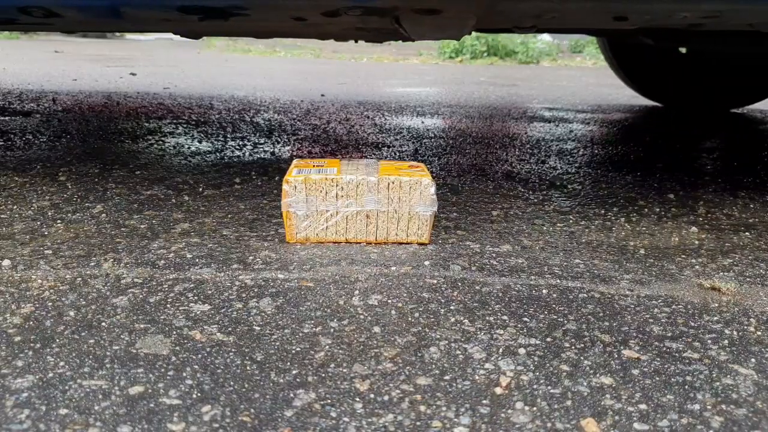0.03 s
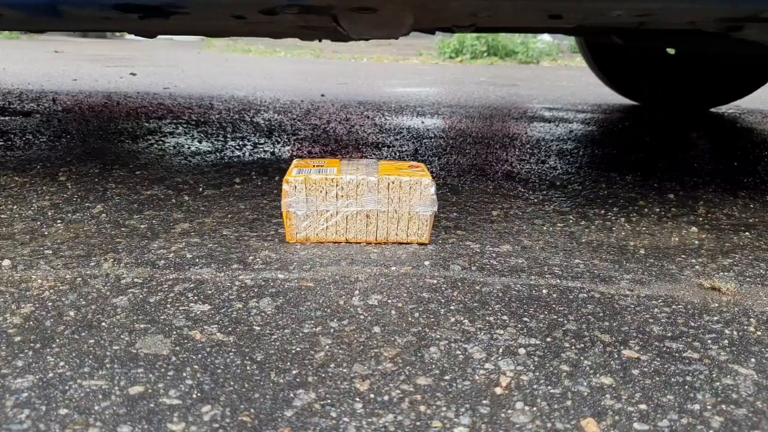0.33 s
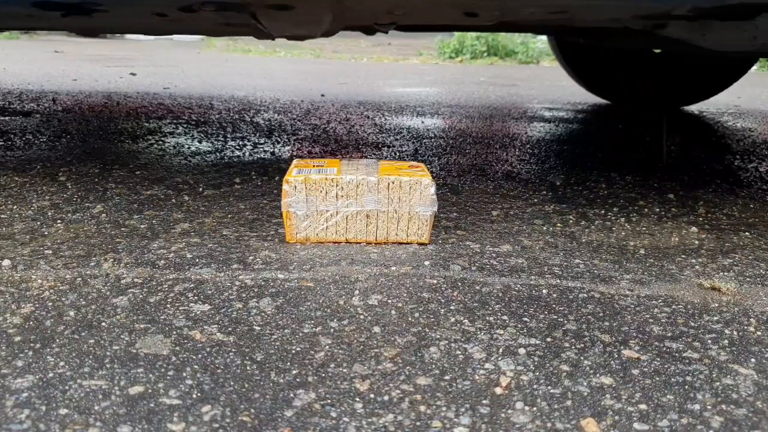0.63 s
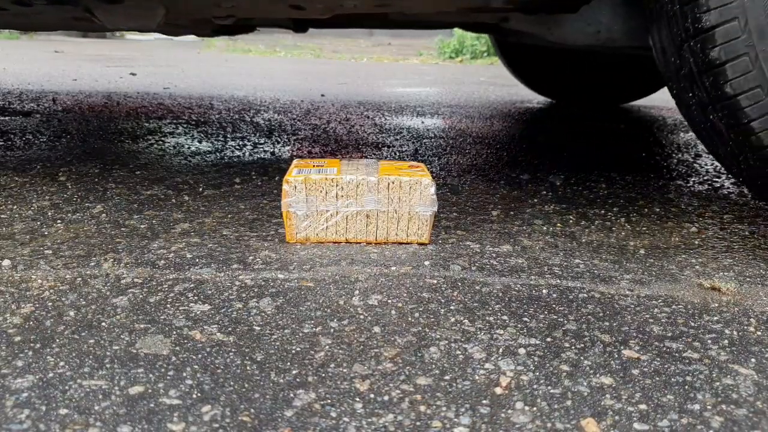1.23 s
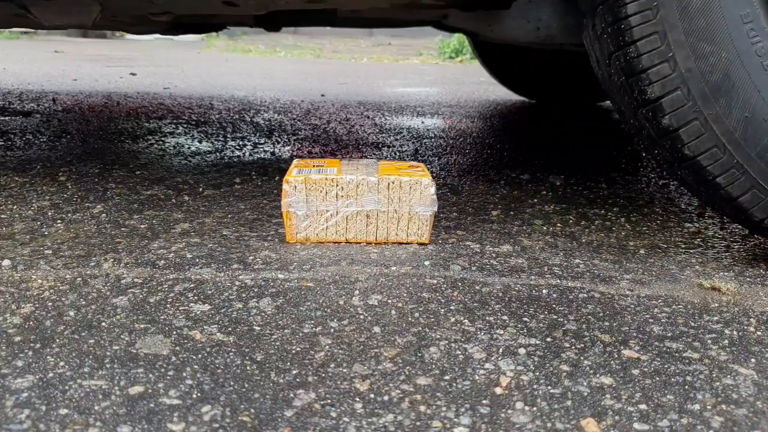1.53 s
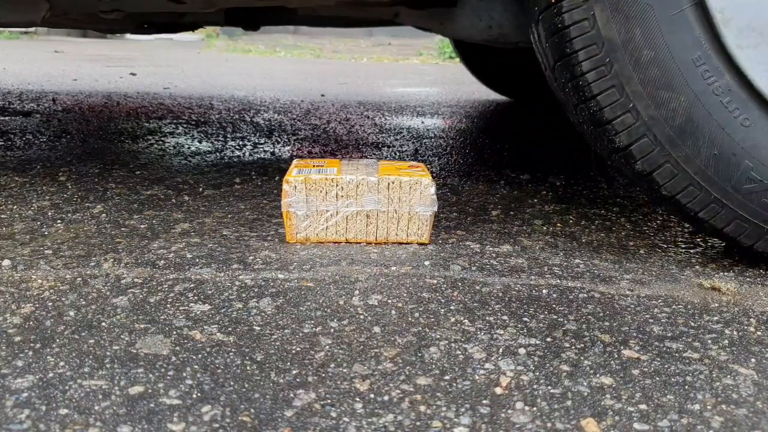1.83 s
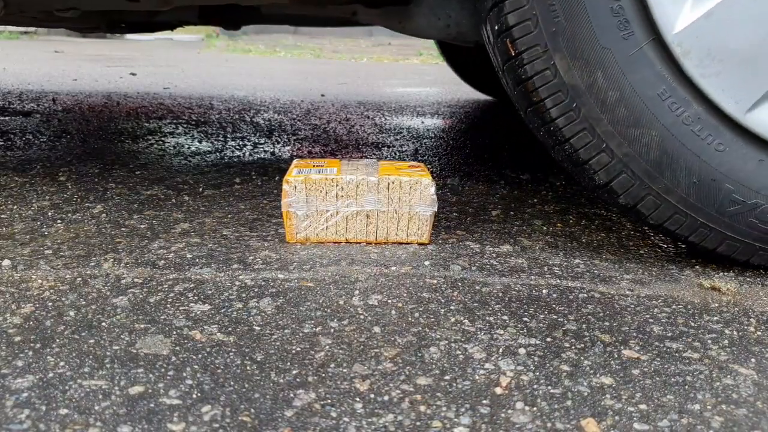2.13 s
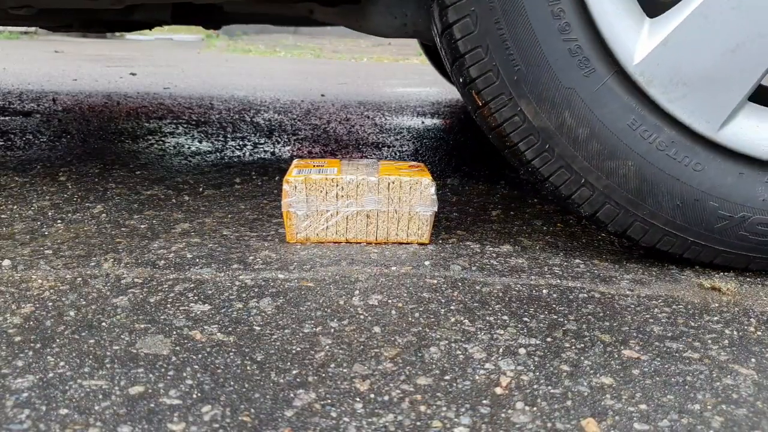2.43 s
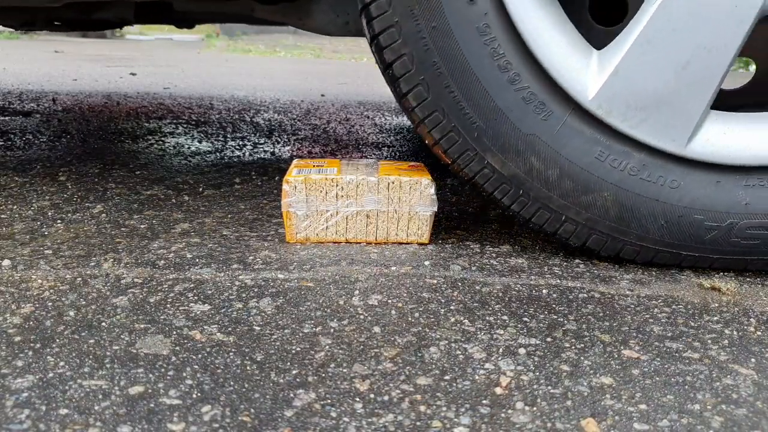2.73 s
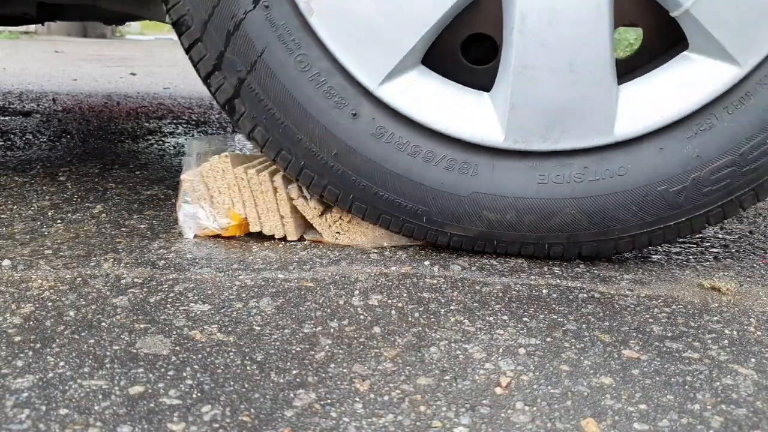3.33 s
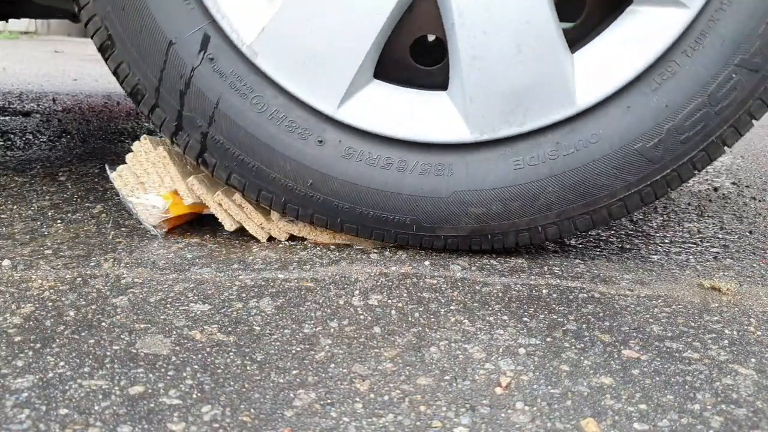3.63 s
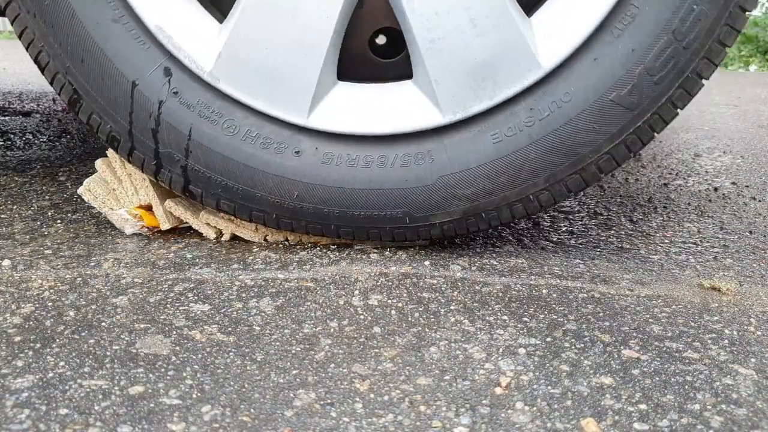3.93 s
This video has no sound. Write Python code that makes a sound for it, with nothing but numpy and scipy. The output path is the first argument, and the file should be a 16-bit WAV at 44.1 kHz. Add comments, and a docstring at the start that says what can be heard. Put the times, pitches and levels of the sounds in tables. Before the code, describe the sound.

A packet of crispbread is crushed with brittle snaps by a slowly creeping car.

```python
"""A car crushes crispbread

A car creeps over damp asphalt with its engine idling, a brake squealing faintly and grit ticking
under its tyre. At 2.9 s the tyre meets a wrapped packet of crispbread: the first slices burst in a
dense crunch, then the rest snap one by one over crackling crumbs and film.
The tyre's sounds bounce between the road and the car's floor."""
import sys
import numpy as np
from scipy import signal
from scipy.fft import rfft, irfft, next_fast_len
from scipy.io import wavfile
from scipy.ndimage import uniform_filter1d, map_coordinates

SR = 44100
rng = np.random.default_rng(int(sys.argv[2]) if len(sys.argv) > 2 else 0)


def digitize_waveform(pressure):
    """Quantize a signal to 16-bit integers and store it at the path in sys.argv[1].

    Rows of a 2-D input are taken as channels; values are limited to [-1, 1].
    """
    field = np.atleast_2d(pressure).T
    bounded = np.clip(field, -1, 1)
    quanta = np.round(bounded * 32767).astype(np.int16)
    wavfile.write(sys.argv[1], SR, quanta)


N = 176400

# how often the engine fires: t/s, f/Hz
FIRING_RATE = [(0, 37.76), (.4, 37.51), (.85, 32.92), (1.25, 33.19), (1.95, 37.68), (2.35, 38.26),
               (2.95, 36.93), (3.3, 37.78), (4, 34.8)]
# the exhaust: t/s, firing tone level/dB, boom level/dB
EXHAUST_LEVELS = [(0, -24.5, -31.5), (.45, -26, -26.5), (.7, -26.5, -24.5), (1.05, -39, -22),
                  (1.35, -28.5, -29), (1.7, -25.5, -24), (2.3, -22.5, -30.5), (2.6, -27, -32.5),
                  (2.9, -25, -25.5), (3.2, -29.5, -28.5), (4, -31, -35)]
# the engine's rumble: t/s, level/dB
RUMBLE_LEVEL = [(0, -30), (.6, -30.5), (1, -33), (3.3, -31), (4, -35.5)]
# its tone colour: f/Hz, level/dB
RUMBLE_SPECTRUM = [(30, -23), (62, -0.5), (115, -1), (160, -9.5), (280, -9), (450, -14.5), (800, -24.5),
                   (8000, -86)]
# how alike it is left and right: f/Hz, likeness (-1 to 1)
RUMBLE_ALIKE = [(60, 1), (200, 0.9), (700, 0.81)]
# the engine bay's whirr: t/s, level/dB
WHIRR_LEVEL = [(0, -37), (1, -41), (2.5, -36), (4, -42)]
# its tone colour: f/Hz, level/dB
WHIRR_SPECTRUM = [(250, -2), (670, 4), (1220, -0.5), (1520, 9), (1950, -1.5), (3300, -7), (4500, -12.5),
                  (7600, -18), (14500, -23)]
# how alike it is left and right: f/Hz, likeness (-1 to 1)
WHIRR_ALIKE = [(400, -0.42), (1450, -0.78), (2800, 0.28), (7000, -0.2)]

# rubber leaving the road: f/Hz, level/dB
TREAD_SPECTRUM = [(1500, -1), (3000, 9), (5000, -2.5), (14000, -5)]
# stones scraping: middle t/s, level/dB
SCRAPES = [(1.088, -43), (1.635, -48.5)]
# echo under the car: f/Hz, time to fade by 60 dB t/s
ECHO_DECAY = [(200, 0.033), (1500, 0.062), (10000, 0.066)]
# echo against direct sound: f/Hz, level/dB
ECHO_SPECTRUM = [(700, -12), (1500, -6), (3500, -3.5)]
# the brake rubbing: middle t/s, half length t/s
SQUEALS = [(.22, .17), (1.85, 0.18)]
# grit under the tyre: t/s, level/dB, pitch f/Hz
GRIT_TICKS = [(.713, -41, 6260), (.797, -40, 8700), (.82, -37.5, 5960), (1.055, -29.5, 3100),
              (1.055, -31.5, 8340), (1.462, -38.5, 9900), (1.5, -30, 950), (1.5, -39, 12480),
              (1.63, -39, 9000), (2.386, -33.5, 2374)]
# how a stone rings: multiple of its pitch, level/dB
STONE_RING = [(.25, -28), (.72, -10), (1, 1), (2.6, -26.5)]

# crushing: t/s, crumb level/dB, crackle level/dB
CRUSH_LEVELS = [(2.895, -51, -50.5), (2.927, -27.5, -27.5), (2.965, -25, -24.5), (3.03, -23, -21),
                (3.108, -23.5, -21.5), (3.15, -34, -33.5), (3.235, -28.5, -28), (3.27, -30, -31),
                (3.5, -32.5, -36), (3.66, -32, -31), (3.82, -35, -33), (4, -34.5, -37)]
# breaking crumbs: f/Hz, level/dB
CRUMB_SPECTRUM = [(70, -20.5), (140, -1), (270, 3.5), (420, -8), (780, 2.5), (1450, -6), (2300, -14),
                  (3300, -11), (5500, -14.5), (14000, -26)]
# crackling film and crust: f/Hz, level/dB
CRACKLE_SPECTRUM = [(800, -21.5), (2000, 1.5), (4000, -1), (6000, -3), (7700, -6), (8700, 1.5),
                    (11000, -1.5), (14500, -5.5)]
# slices and film snapping: t/s, level/dB, pitch f/Hz
SNAPS = [(2.923, -30, 6534), (2.95, -22, 1400), (2.96, -17, 1195), (2.978, -17.5, 960), (2.986, -14, 1602),
         (3.007, -16.5, 1500), (3.024, -22.5, 2200), (3.033, -22, 3500), (3.042, -22, 1200),
         (3.054, -23, 1330), (3.063, -20, 1020), (3.074, -18, 1010), (3.094, -21.5, 930),
         (3.102, -14.5, 951), (3.113, -22.5, 8330), (3.172, -21.5, 1480), (3.185, -22, 810),
         (3.235, -24.5, 2440), (3.276, -27, 1498), (3.296, -23, 2240), (3.311, -26.5, 2014),
         (3.348, -24.5, 1900), (3.362, -26, 1000), (3.379, -28, 5000), (3.445, -25, 720),
         (3.578, -25.5, 1711), (3.601, -27, 1300), (3.648, -25.5, 1907), (3.653, -19, 841),
         (3.672, -22, 1566), (3.686, -23.5, 1490), (3.723, -22, 1109), (3.761, -22, 760),
         (3.776, -27.5, 1690), (3.843, -29, 1874), (3.867, -19, 1646), (3.867, -24, 8550),
         (3.908, -28, 1200), (3.964, -28.5, 1290), (3.989, -29, 1100)]
# how a slice rings: multiple of its pitch, level/dB
SLICE_RING = [(.15, -22.5), (.55, -10), (1, -0.5), (1.45, -12), (2.2, -11), (9, -27)]
# the stack hitting the road: t/s, level/dB
KNOCKS = [(2.97, -24), (3.031, -24), (3.067, -24.5), (3.186, -23.5), (3.296, -20), (3.445, -23),
          (3.672, -22), (3.868, -28.5), (3.912, -28)]
# one dull knock: f/Hz, level/dB
KNOCK_SPECTRUM = [(80, -21), (230, 4.5), (700, -2), (3000, -61)]


def amp(db):
    """Turn decibels into a gain."""
    return 10 ** (np.asarray(db) / 20)


def unit(x):
    """Scale to an average strength (rms) of 1."""
    return x / np.sqrt(np.mean(x ** 2) + 1e-20)


def along(points, hz):
    """Read a (f/Hz, value) table at hz, on a log axis."""
    f, v = np.transpose(points)
    return np.interp(np.log(hz + 1), np.log(f + 1), v)


def curves(rows):
    """One value per sample for each column after the time."""
    s, *cols = np.transpose(rows)
    return [np.interp(np.arange(N) / SR, s, c) for c in cols]


def wobble(rate):
    """A smooth random curve through rate points a second."""
    return map_coordinates(rng.standard_normal(2048), [np.arange(N) * rate / SR], mode="wrap")


def filtered(x, response):
    """Scale each frequency of x by response(hz)."""
    m = next_fast_len(N + SR // 2)
    return irfft(rfft(x, m) * response(np.fft.rfftfreq(m, 1 / SR)), m)[..., :N]


def rush(spectrum, alike):
    """Stereo noise with the given tone colour."""
    def response(hz):
        width = np.arccos(np.clip(along(alike, hz), -1, 1)) / 2
        return amp(along(spectrum, hz)) * [np.cos(width), np.sin(width)]
    mid, side = filtered(rng.standard_normal((2, N)), response)
    return unit(np.array([mid + side, mid - side]))


def patchy(x, depth_db):
    """Let each band of pitches swell and sink on its own."""
    bands = signal.stft(x, nperseg=512)[2]
    swells = uniform_filter1d(rng.standard_normal(bands.shape[1:]), size=5, axis=0)
    swells = uniform_filter1d(swells, size=9, axis=1)
    return unit(signal.istft(bands * amp(depth_db * unit(swells)), nperseg=512)[1][:, :N])


def engine():
    """The firing rate sets the exhaust's low tones and makes the rumble and whirr throb."""
    rate_hz, = curves(FIRING_RATE)
    firing_db, boom_db = curves(EXHAUST_LEVELS)
    phase = 2 * np.pi * np.cumsum(rate_hz) / SR
    pulse = np.sin(phase)
    tones = amp(firing_db + 2.9 * wobble(32)) * pulse
    tones += amp(boom_db - 2.5 + 1.6 * wobble(21)) * np.sin(2 * phase + wobble(6.1) / 2)
    tones += amp(-39.5 + 1.3 * wobble(4.9)) * np.sin(3 * phase + .5 * wobble(8.5))
    boom = rush([(46, -32), (63, 1.0), (79, -12.5), (110, -21.5), (900, -110)], RUMBLE_ALIKE)
    boom *= amp(boom_db - 1.5)
    rumble = rush(RUMBLE_SPECTRUM, RUMBLE_ALIKE)
    rumble *= amp(curves(RUMBLE_LEVEL)[0]) * (1 + .082 * pulse)
    whirr = patchy(rush(WHIRR_SPECTRUM, WHIRR_ALIKE), depth_db=2.5)
    whirr *= amp(curves(WHIRR_LEVEL)[0]) * (1 + .12 * pulse)
    return np.sqrt(2) * tones + boom + rumble + whirr


def impulses(s, sizes, lag_s):
    """Clicks at times s, heard lag_s earlier on the left than on the right."""
    at = lambda t: np.clip(np.round(t * SR), 0, N).astype(int).ravel()
    return np.array([np.bincount(at(s + side * lag_s / 2), sizes.ravel(), N + 1)[:N] for side in (-1, 1)])


def fractures(per_s, spread_db, clump_db, lag_s, scatter_s, count=60000):
    """Countless tiny clicks of uneven size, in clumps."""
    s = np.cumsum(rng.exponential(1, count)) / per_s
    sizes = rng.choice([-1, 1], count) * amp(spread_db * np.minimum(rng.standard_normal(count), 2))
    clicks = impulses(s, sizes, lag_s + scatter_s * rng.standard_normal(count))
    return unit(clicks * amp(clump_db * np.minimum(wobble(170), 2)))


def struck(clicks, spectrum, size=2048):
    """Each click rings a body with the given tone colour."""
    cepstrum = irfft(np.log(amp(along(spectrum, np.fft.rfftfreq(size, 1 / SR)))))
    cepstrum[1:size // 2] *= 2
    cepstrum[size // 2 + 1:] = 0  # no ringing before the click
    body = irfft(np.exp(rfft(cepstrum)))
    return signal.fftconvolve(clicks, body[None] / np.linalg.norm(body), axes=1)[:, :N]


def tread(scrape_half_s=.019):
    """The tread peels off the damp road with a fine crackle; stones scrape briefly under it."""
    t = np.arange(N) / SR
    peeling = amp(-47) * np.exp(-((t - 1.15) / 1.4) ** 2)
    scraping = sum(amp(db) * np.exp(-((t - s) / scrape_half_s) ** 2) for s, db in SCRAPES)
    crackle = fractures(per_s=2000, spread_db=3, clump_db=2, lag_s=0, scatter_s=.0002)
    return (peeling + scraping) * struck(crackle, TREAD_SPECTRUM)


def underbody_echo(x, delay_s=.00079, size=1764):
    """Quick echoes between road, tyre and car floor keep changing as the wheel moves on."""
    pieces = x.reshape(2, -1, size)  # each piece gets its own tail of fading noise
    noise = rng.standard_normal(pieces.shape[:2] + (2 * size,))
    hz, t, bands = signal.stft(noise, SR, nperseg=256)
    fade = amp(-60 * t / along(ECHO_DECAY, hz)[:, None])
    tails = signal.istft(bands * fade, SR, nperseg=256)[1]
    tails /= np.linalg.norm(tails, axis=-1, keepdims=True)
    echoes = signal.fftconvolve(pieces, tails, axes=-1)
    out = np.zeros((2, N + SR))
    for k in range(pieces.shape[1]):
        out[:, k * size:][:, :echoes.shape[-1]] += echoes[:, k]
    bounce = lambda f: amp(along(ECHO_SPECTRUM, f)) * np.exp(-2j * np.pi * f * delay_s)
    return filtered(out[:, :N], bounce)


def brake(pitch_hz=5610, level_db=-57, flutter_db=4.0):
    """A rubbing brake squeals in thin chirps that swell and fade as the wheel turns."""
    t = np.arange(N) / SR
    swell = sum(np.exp(-((t - s) / half_s) ** 4) for s, half_s in SQUEALS)
    phase = 2 * np.pi * pitch_hz * t + np.array([wobble(200), wobble(200)])
    return amp(level_db + flutter_db * wobble(50)) * swell * np.sin(phase)


def crack_steps(step_s, fade_db, lag_s, scatter_s, count=24, size=1024):
    """A crack runs in quick clicks at its own pace, swelling and fading."""
    gap, strength, place = rng.standard_normal((3, count))
    times = np.cumsum(step_s * np.exp(.2 * rng.standard_normal() + .4 * gap))
    sizes = strength * amp(-fade_db * np.abs(np.arange(count) / count - .25))
    return impulses(times, sizes, lag_s + scatter_s * place)[:, :size]


def add_break(out, s, db, body):
    """One break rings its body at time s; db is its level over 4 ms."""
    clicks = crack_steps(step_s=.0003, fade_db=43.5, lag_s=.00003, scatter_s=.00002)
    ring = struck(clicks, body)
    ring *= np.sqrt(.004 * SR / np.mean(np.sum(ring ** 2, axis=1)))
    slot = out[:, round(s * SR):][:, :ring.shape[1]]
    slot += amp(db) * ring[:, :slot.shape[1]]


def cracks(rows, ring):
    """Brittle pieces break, each ringing around its own pitch."""
    out = np.zeros((2, N))
    for s, db, hz in rows:
        add_break(out, s, db, [(hz * multiple, level) for multiple, level in ring])
    return out


def crunch():
    """The tyre's weight grinds the bread and crinkles its wrapper."""
    crumb_db, crackle_db = curves(CRUSH_LEVELS)
    coarse = fractures(per_s=4500, spread_db=5.0, clump_db=1.55, lag_s=.00004, scatter_s=.00004)
    fine = fractures(per_s=6000, spread_db=4.5, clump_db=2.3, lag_s=-.000033, scatter_s=.0001)
    crumbs = struck(coarse, CRUMB_SPECTRUM)
    crackle = patchy(struck(fine, CRACKLE_SPECTRUM), depth_db=1.5)
    return amp(crumb_db) * crumbs + amp(crackle_db) * crackle


def knocks():
    """The stack of slices gives way and hits the road with dull blows."""
    out = np.zeros((2, N))
    for s, db in KNOCKS:
        add_break(out, s, db, KNOCK_SPECTRUM)
    return out


def scene():
    """Mix the tyre's sounds with their echo, the engine and the brake."""
    tyre = crunch() + cracks(SNAPS, SLICE_RING) + knocks() + cracks(GRIT_TICKS, STONE_RING) + tread()
    tyre *= amp([[.5], [-.5]])  # slightly to the left
    return tyre + underbody_echo(tyre) + engine() + brake()


def record(dry, top_hz=14650):
    """Cut off the very highest treble."""
    return filtered(dry, lambda hz: 1 / np.sqrt(1 + (hz / top_hz) ** 240))


dry = scene()
out = record(dry)
digitize_waveform(out)
```